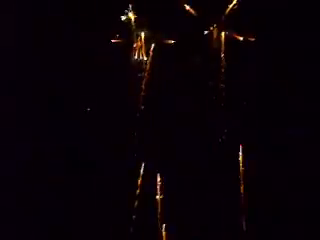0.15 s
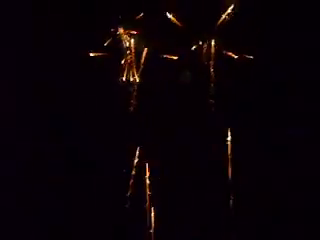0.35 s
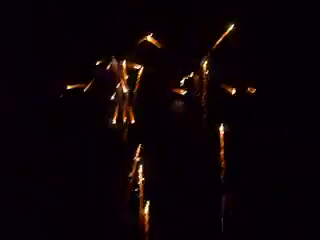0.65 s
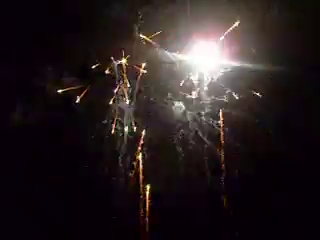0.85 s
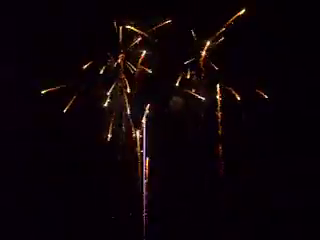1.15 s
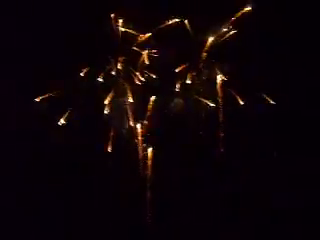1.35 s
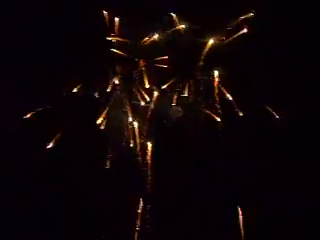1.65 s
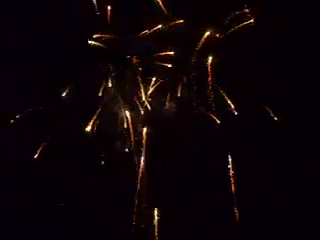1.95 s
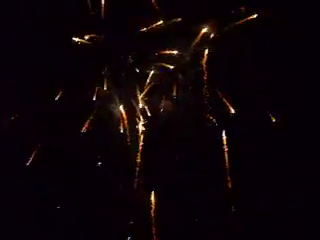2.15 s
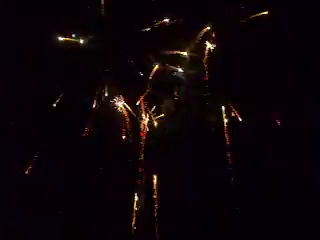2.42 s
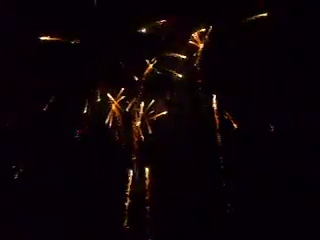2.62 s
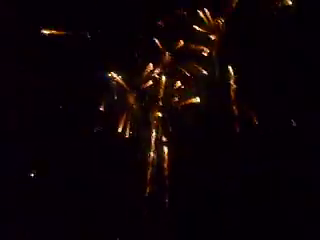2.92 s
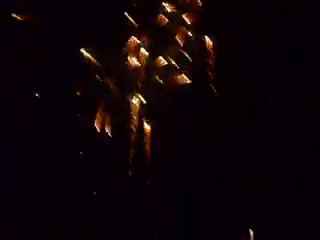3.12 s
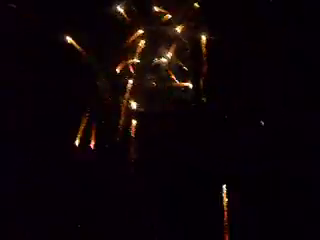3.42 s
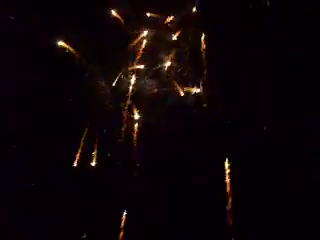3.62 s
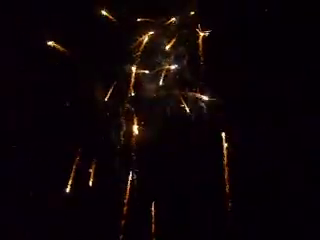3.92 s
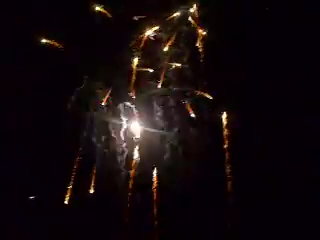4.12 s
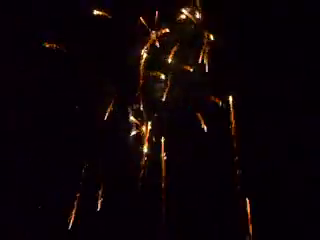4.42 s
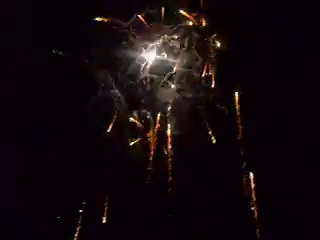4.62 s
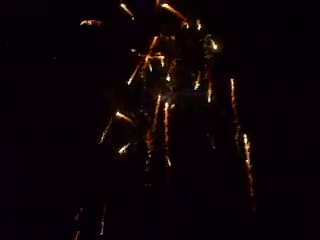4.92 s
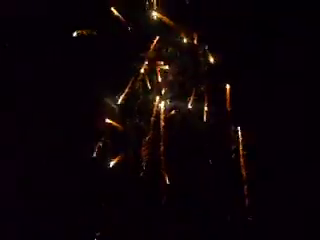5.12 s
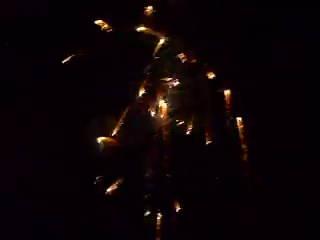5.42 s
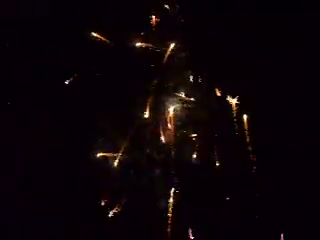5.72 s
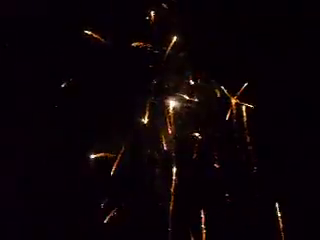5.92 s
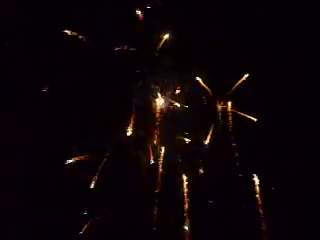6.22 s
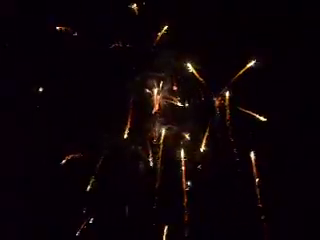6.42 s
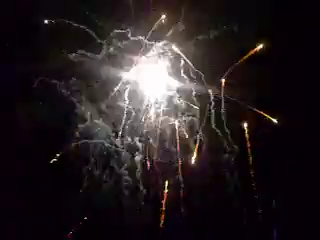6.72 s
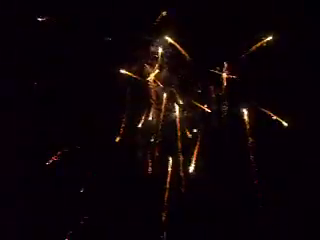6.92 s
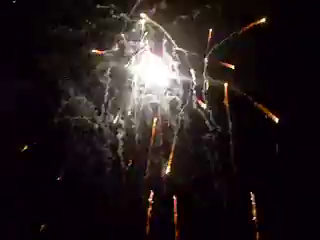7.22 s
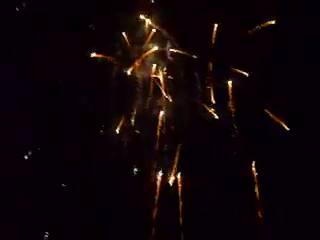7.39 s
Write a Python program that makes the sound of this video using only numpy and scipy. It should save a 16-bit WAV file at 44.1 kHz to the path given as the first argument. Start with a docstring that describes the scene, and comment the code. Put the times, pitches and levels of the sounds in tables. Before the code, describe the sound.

Outdoors at night, a firework battery keeps up a thick, unbroken crackle of tiny sharp pops over fine fizz. Dry bangs burst overhead almost from the start, some in quick pairs, with short echoes. After the first second, launches add cracks of gas, low hollow thumps and brief rumbles. A small microphone clips and ducks on the bangs, dull at the very top.

```python
"""A firework battery fires into the night, heard outdoors on a small microphone that overloads.
Over a faint low drone, glittering trails crackle without pause: thousands of tiny paired impulses.
Almost at once shells burst overhead, dry band-limited bangs with echoes, and sharp snaps stand out.
The crackle builds up over the first second; from then on comets also leave their tubes with a crack
of gas noise, a thump, a building echo, a ringing tube and a rumble, until the end."""
import sys
import numpy as np
from scipy import signal
from scipy.fft import rfft, irfft, next_fast_len
from scipy.io import wavfile
from scipy.ndimage import uniform_filter1d, minimum_filter1d

SR = 44100
rng = np.random.default_rng(int(sys.argv[2]) if len(sys.argv) > 2 else 0)


def pcm_store(signal):
    """Save signal as 16-bit PCM."""
    levels = np.round(np.clip(np.atleast_2d(signal), -1, 1) * 32767)
    wavfile.write(sys.argv[1], SR, levels.astype(np.int16).T)


N = 332955
TIME = np.arange(N) / SR
GROUND_ECHO_S = 0.001673
FULL_GLITTER_DB = -19  # crackle level of a full sky


def from_db(db):
    """Decibels to gain."""
    return 10 ** (np.asarray(db) / 20)


def rms_one(x):
    """Scale to unit rms."""
    return x / np.sqrt(np.mean(x ** 2) + 1e-20)


def colour(x, points):
    """Filter by a spectrum of (Hz, dB) points, interpolated over log frequency."""
    size = next_fast_len(N + 8192)
    hz, db = np.transpose(points)
    bins_hz = np.maximum(np.arange(size // 2 + 1) * SR / size, 1)
    gain = from_db(np.interp(np.log(bins_hz), np.log(hz), db))
    return irfft(rfft(x, size) * gain, size)[:N]


def coloured_noise(points):
    """Gaussian noise of a given spectrum, at unit rms."""
    return rms_one(colour(rng.standard_normal(N), points))


def clicks(times_s, heights):
    """One impulse at each time."""
    samples = np.maximum(np.round(times_s * SR), 0).astype(int)
    return np.bincount(samples, heights, N)[:N]


def delayed(x, seconds):
    """The same sound, later."""
    return np.interp(TIME - seconds, TIME, x, left=0)


def dying(hits, t60_s):
    """An envelope that jumps at each impulse and dies away by 60 dB in t60_s."""
    return signal.lfilter([1], [1, -from_db(-60 / (t60_s * SR))], hits + 1e-18)


def wander(step_s):
    """A random value that glides to a new one over every step."""
    return np.interp(TIME / step_s, np.arange(4000), rng.standard_normal(4000))


def n_wave(hits, size=6):
    """A tiny explosion: two opposite impulses, size samples apart, further for a larger grain."""
    return delayed(hits, size / SR) - hits


def air():
    """The faint low drone of the night air: coloured noise."""
    # drone spectrum: pitch_hz, level_db
    drone_points = [(20, -7.5), (60, -7), (150, -3), (500, -9.5), (4000, -41)]
    return from_db(-51.0) * coloured_noise(drone_points)


def glitter_db():
    """The level of the crackle at every moment: the slow trend, with the flares on top."""
    # trend of the crackle: time_s, level_db
    trend = [(0.0, -26.0), (0.22, -26.5), (0.3, -23), (0.62, -24.5), (0.76, -21), (1.28, -18), (1.55, -20),
             (1.9, -19), (2.7, -19), (3.1, -20.5), (3.44, -20), (3.6, -18), (4.1, -18), (4.75, -19.5),
             (5.3, -18.5), (5.85, -20.5), (6.42, -18.5), (6.6, -20.5), (6.92, -16.5), (7.55, -19.5)]
    # stars that flare up in a short rush of crackle: peak_s, rise_db
    flare_list = [(0.085, 3.5), (0.41, 2.5), (0.575, 4.5), (1.29, 2.5), (1.65, 2.5), (2.3, 2.5), (2.66, 3),
                  (3.33, 2.5), (3.52, 3), (4.08, 2), (4.84, 2.5), (5.15, 3), (6.4, 2), (7.23, 4.5),
                  (7.49, 2.5)]
    half_width_s = .021  # to 1/e of the rise
    flares = sum(db * np.exp(-((TIME - s) / half_width_s) ** 2) for s, db in flare_list)
    return np.interp(TIME, *np.transpose(trend)) + flares


def sparks(times_s, heights, ground_db, spread):
    """Tiny explosions, each followed by a ground echo of random lag and loss."""
    chance = rng.standard_normal((len(times_s), 2))
    lag_s = GROUND_ECHO_S * np.exp(spread * chance[:, 0])
    echo_heights = heights * from_db(ground_db - 13.7 * np.abs(chance[:, 1]))
    return clicks(times_s, heights) + clicks(times_s + lag_s, echo_heights)


def grains(per_s, size_db, size_spread_db, ground_db):
    """Explosions at random moments, of random sizes up to that of a whole grain."""
    born = rng.random(N) < per_s / SR
    sizes = from_db(size_db - size_spread_db * np.abs(rng.standard_normal(N)))
    return sparks(TIME[born], sizes[born], ground_db, spread=0.05)


def crackle(clump_db):
    """Sharp pops stand out of a fizz of finer grains; a fuller sky mainly gives more pops."""
    # spectrum of the fine grains and their scattered sound: pitch_hz, level_db
    fizz_points = [(30, -27), (100, -14.5), (200, -6.5), (400, -7.5), (700, 0), (1100, 2), (1600, 0.5),
                   (2500, 5.5), (3400, 0), (4500, 2.5), (6000, -1.5)]
    # pop rates in a full sky, before random clumping
    sharp_per_s, round_per_s, fine_per_s = 190, 105, 1800
    pop_db, pop_spread_db = 4, 6.0
    # the crackle swells and ebbs a little by chance
    swell_s, swell_db = .05, 0.25

    level_db = glitter_db() + swell_db * wander(swell_s)
    fullness_db = level_db - FULL_GLITTER_DB
    busy = from_db(1.2 * fullness_db + clump_db * wander(step_s=.004))
    size_db = pop_db + 0.44 * np.minimum(fullness_db, 0)
    sharp = grains(sharp_per_s * busy, size_db, pop_spread_db, ground_db=-1.5)
    round_pops = grains(round_per_s * busy, size_db + 1, pop_spread_db, ground_db=-1)
    fine = rms_one(grains(fine_per_s * busy, size_db=0.3 * fullness_db, size_spread_db=10.5, ground_db=-3.0))

    # each pop scatters off the surroundings for a few milliseconds
    scatter_envelope = np.sqrt(dying(sharp ** 2 + round_pops ** 2, t60_s=0.023))
    scatter = from_db(-25.5) * rms_one(scatter_envelope * rng.standard_normal(N))
    # far crackle merges into a hiss
    hiss = from_db(-10) * from_db(level_db) * rng.standard_normal(N)
    fine_without_drift = fine - uniform_filter1d(fine, size=200)
    fizz = from_db(-20.0) * fine_without_drift + scatter + hiss
    return n_wave(sharp, size=5) + n_wave(round_pops, size=9) + colour(fizz, fizz_points)


def blast(hits, low_hz, high_hz, order):
    """Each impulse becomes a short band-limited pressure wave of the same height."""
    band = signal.butter(order, [low_hz, high_hz], "band", fs=SR, output="sos")
    height = np.abs(signal.sosfilt(band, signal.unit_impulse(SR // 10))).max()
    return -signal.sosfilt(band, hits + 1e-18) / height


def thud(hits, hz):
    """A single swing of pressure that does not ring: one crest between two troughs."""
    phase = np.pi * hz * np.arange(-400, 401) / SR
    swing = (1 - 2 * phase ** 2) * np.exp(-phase ** 2)
    return signal.fftconvolve(hits, swing, "same")


def bursts():
    """A bang arrives directly, off the ground and off a wall, then scattered from further away."""
    # shells bursting, levels relative: start_s, bang_db, scatter_db, wall_delay_s
    shells = [(0.1118, 0, -10.5, 0.0045), (0.426, 0, -12.5, 0.0048), (1.12, -4.5, -15, 0.0051),
              (1.2009, -2, -15.5, 0.0061), (1.5416, -1, -14, 0.00498), (2.4026, -3, -15.5, 0.0044),
              (2.6748, -3, -11, 0.0045), (2.7154, -3.5, -16.5, 0.005), (2.8395, -2, -13.5, 0.0049),
              (4.1605, -2, -14, 0.0052), (4.4101, -2, -12, 0.004), (4.432, -1.5, -16, 0.005),
              (4.9546, -5, -13, 0.0049), (5.984, -3, -12.5, 0.0049), (6.5122, -2, -18, 0.0046),
              (7.0738, -0.5, -24, 0.0052), (7.112, -1.5, -15, 0.0048)]
    # spectrum of a bang scattered by the surroundings: pitch_hz, level_db
    scatter_points = [(30, -42), (130, -10.5), (300, -7.5), (450, 2.5), (600, -3.5), (800, -3.5),
                      (1200, -6), (2000, -13.5), (5000, -34)]
    times_s, bang_db, scatter_db, wall_s = np.transpose(shells)
    heights = from_db(bang_db)
    hits = clicks(times_s, heights)

    bang = from_db(6.5) * blast(hits, low_hz=340, high_hz=1775, order=2)
    front = from_db(2) * n_wave(hits)  # the shock at the head of the wave
    ground = from_db(-2.5) * delayed(bang + front, GROUND_ECHO_S)
    wall_hits = clicks(times_s + wall_s, heights)
    wall = from_db(2.5) * blast(wall_hits, low_hz=248, high_hz=1200, order=2)
    body = from_db(-19.5) * thud(delayed(hits, 0.00053), hz=170)

    near = from_db(-12.5) * dying(delayed(hits, .005), t60_s=0.072)
    far = from_db(-8.5) * dying(clicks(times_s + .018, from_db(scatter_db)), t60_s=0.23)
    scattered = (near + far) * coloured_noise(scatter_points)
    return bang + front + ground + wall + body + scattered


def snaps():
    """Larger grains of glitter crack singly, the random ones more often in a full sky."""
    # the snaps that stand out most, levels relative: start_s, level_db
    loud_snaps = [(0.2434, -2.5), (0.3402, -3), (0.4005, -5.5), (0.575, -1), (0.697, -4.5), (0.8309, -4),
                  (1.41, -2), (1.5145, -1), (1.6566, -1.5), (2.3276, -2), (2.5118, -1), (3.6974, -1),
                  (4.3066, -3), (4.4757, -0.5), (4.989, -1.5), (5.612, -2), (6.1607, -1.5), (6.4035, 0),
                  (6.9185, -5), (7.1971, -3.5), (7.4524, 0)]
    full_sky_per_s, size_db, size_spread_db = 13, -3.5, 1
    times_s, db = np.transpose(loud_snaps)
    loudest = sparks(times_s, from_db(db), ground_db=-3.5, spread=0.23)
    per_s = full_sky_per_s * from_db(glitter_db() - FULL_GLITTER_DB)
    others = grains(per_s, size_db, size_spread_db, ground_db=0.5)
    return from_db(9.0) * n_wave(loudest + others)


def tube_ring(hits):
    """Each shot leaves the air column of its emptied tube sounding in decaying sines."""
    # modes of the tube: pitch_hz, level_db, t60_s
    modes = [(120, -31.5, 0.14), (266.5, -21.5, 0.27), (406, -24.5, 0.23)]
    t = TIME[:SR // 4]
    response = sum(from_db(db - 60 * t / t60_s) * np.sin(2 * np.pi * hz * t) for hz, db, t60_s in modes)
    return signal.fftconvolve(hits, response)[:N]


def launches():
    """The muzzle cracks, the lifting gas thumps, the tube rings, and a building throws the shot back."""
    # comets leaving tubes, levels relative: start_s, thump_db, crack_db, echo_delay_s, thump_pitch_hz
    comets = [(1.004, -13.5, -9, 0.048, 232), (1.156, -7.5, -8.5, 0.057, 265),
              (1.2658, -9.5, -4, 0.057, 235), (1.8644, -10, -5.5, 0.051, 246), (2.909, -12, -5, 0.053, 230),
              (3.267, -11.5, -7, 0.049, 275), (3.5177, -9, -6, 0.05, 217), (4.0261, -11, -5, 0.062, 248),
              (4.8955, -9.5, -7, 0.057, 278), (5.274, -10.5, -5, 0.058, 240),
              (5.444, -7.5, -3.5, 0.0521, 233), (5.8936, -9, -7, 0.046, 268),
              (6.7186, -9, -6, 0.054, 266.8), (6.8227, -9.5, -3, 0.049, 227),
              (6.9464, -8.5, -1.5, 0.0554, 225)]
    # spectrum of the rumble that follows a launch: pitch_hz, level_db
    rumble_points = [(25, -20), (80, -18), (170, -8), (280, -15), (380, -6), (600, -38), (2000, -59)]
    times_s, thump_db, crack_db, echo_s, pitch_hz = np.transpose(comets)
    heights = from_db(thump_db)
    hits = clicks(times_s + 0.0021, heights)

    gas_puffs = sum(thud(clicks(np.array([s + 0.0027]), np.array([height])), hz)
                    for s, height, hz in zip(times_s, heights, pitch_hz))
    thump = from_db(1) * gas_puffs + from_db(-20) * thud(hits, hz=95) + from_db(-34) * thud(hits, hz=34.4)
    # the echo has lost the top of the thump
    echo = from_db(-8.5) * thud(clicks(times_s + 0.0029 + echo_s, heights), hz=168)
    echo = echo + from_db(-12) * delayed(echo, 0.032)

    # the crack is a jet of gas, under two milliseconds long, with its echo
    jets = clicks(times_s + 0.00086, from_db(crack_db))
    jets = jets + clicks(times_s + 0.0009 + echo_s, from_db(crack_db - 5.0))
    jet_envelope = np.convolve(jets, signal.windows.tukey(84), "same")
    gas = rms_one(blast(rng.standard_normal(N), low_hz=2560, high_hz=5500, order=1))
    crack = from_db(1.5) * jet_envelope * gas

    rumble_envelope = dying(delayed(hits, 0.0074), t60_s=0.21)
    rumble = from_db(-18.5) * rumble_envelope * coloured_noise(rumble_points)
    return thump + echo + crack + tube_ring(delayed(hits, 0.00293)) + rumble


def scene():
    """All the fireworks, at one microphone."""
    return (air() + crackle(clump_db=1.74) + bursts() + snaps() + launches())[None]


def limiter(x, threshold_db, lag_s):
    """The gain drops just after a bang and is held down for some twelve milliseconds."""
    level = np.sqrt(uniform_filter1d(x ** 2, size=220) + 1e-9)
    gain = minimum_filter1d(np.minimum(1, from_db(threshold_db) / level), size=400)
    reduction = 1 - uniform_filter1d(gain, size=90)
    return x * (1 - delayed(reduction, lag_s))


def record(dry):
    """A narrow-band microphone, a limiter too slow for the bangs, flattened peaks, an offset, the top cut."""
    # treble response of the microphone: pitch_hz, level_db
    response_points = [(4000, 2), (5000, 0), (5400, -4.5), (5700, -12), (6000, -21), (6350, -56.5),
                       (7000, -83)]
    top, offset, cutoff_hz = .72, -.0028, 16000
    x = limiter(colour(dry[0], response_points), threshold_db=-8.5, lag_s=0.01)
    x = x / (1 + (x / top) ** 14) ** (1 / 14) + offset
    return colour(x, [(6000, 0), (11000, -3), (cutoff_hz, -5), (1.04 * cutoff_hz, -70)])[None]


dry = scene()
out = record(dry)
pcm_store(out)
```